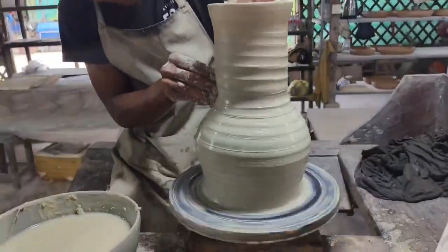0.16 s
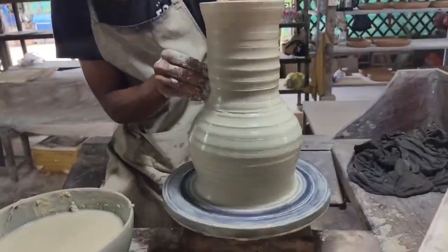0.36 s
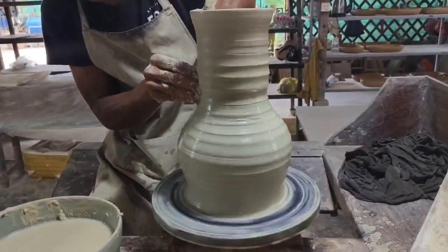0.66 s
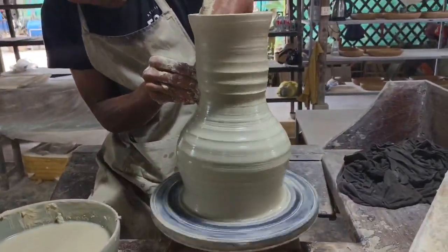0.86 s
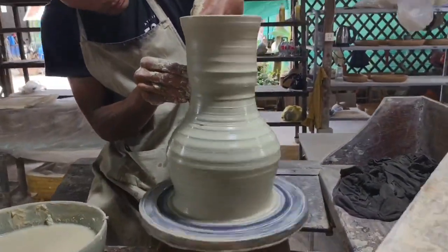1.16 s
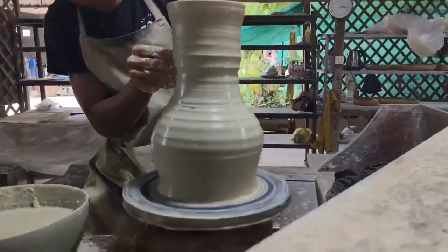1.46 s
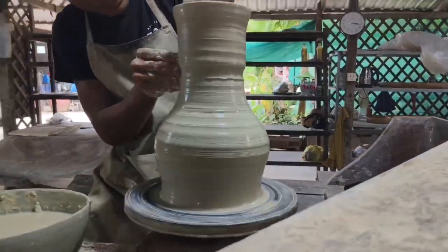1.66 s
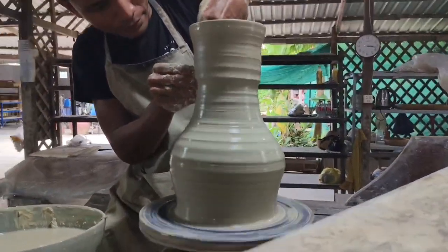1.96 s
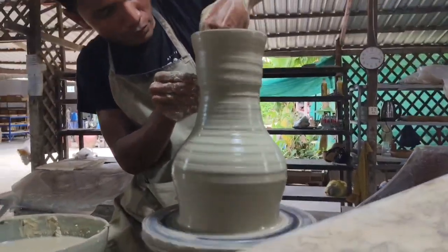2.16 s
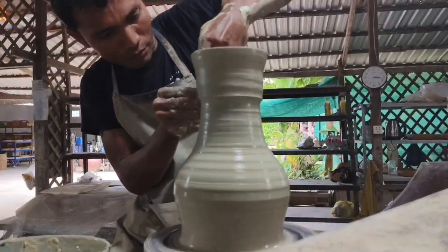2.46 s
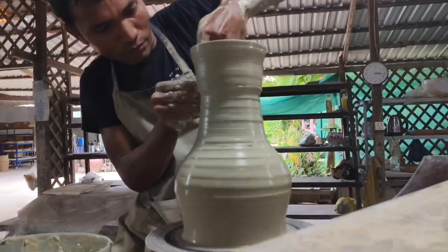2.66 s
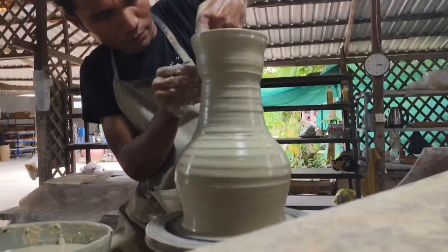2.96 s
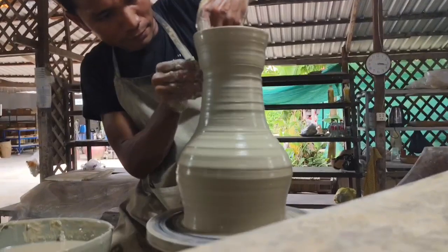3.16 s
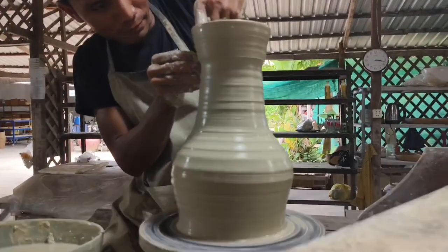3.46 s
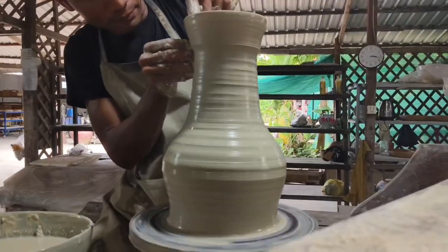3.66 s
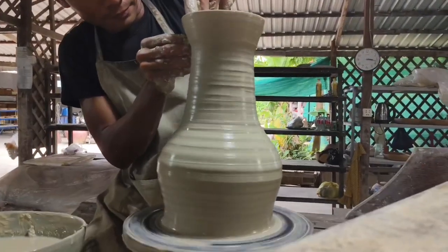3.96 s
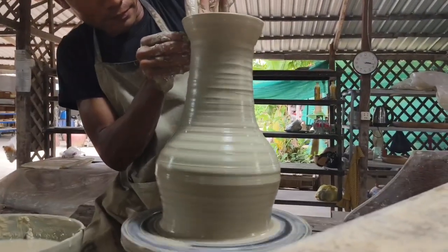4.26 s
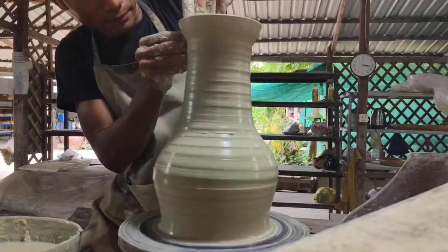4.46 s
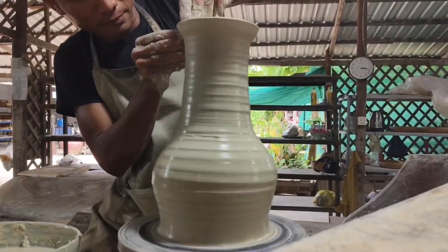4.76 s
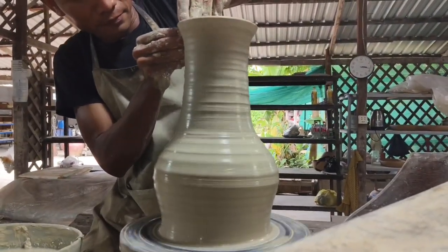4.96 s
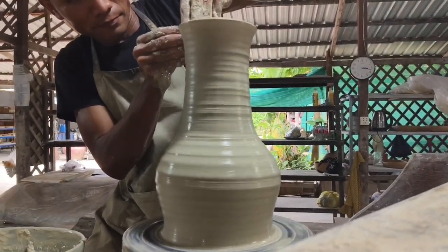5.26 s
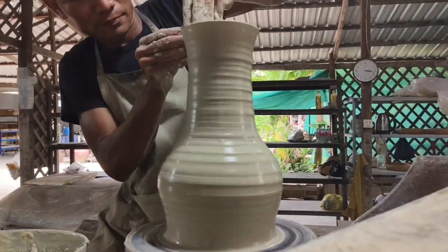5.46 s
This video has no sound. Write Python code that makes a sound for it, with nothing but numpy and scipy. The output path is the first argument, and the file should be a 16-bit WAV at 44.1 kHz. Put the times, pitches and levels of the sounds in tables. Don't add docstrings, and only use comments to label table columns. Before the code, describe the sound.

A potter's wheel hums deep and steady, roughened by dull, irregular bumps. Early on, wet clay spits sharply, then a soft wipe follows near two seconds. A dry bearing chirps and squeaks around three seconds, followed by ticks and foot scuffs. The hum pulses later, and a pot scrapes near the end. Close stereo microphones in an open, tin-roofed workshop, with faint far machines and leaves.

```python
import sys
import numpy as np
from scipy import signal
from scipy.fft import rfft, irfft, next_fast_len
from scipy.io import wavfile
from scipy.ndimage import uniform_filter1d, map_coordinates

SR = 44100
rng = np.random.default_rng(int(sys.argv[2]) if len(sys.argv) > 2 else 0)


def amplitude_ratio(level_db):
    exponent = np.asarray(level_db, float) / 20
    return 10 ** exponent


def unload_audio(sound):
    columns = np.transpose(np.atleast_2d(sound))
    steps = np.round(np.clip(columns, -1, 1) * 32767)
    wavfile.write(sys.argv[1], SR, steps.astype(np.int16))


N = 247386
TIME = np.arange(N) / SR
LAG_SAMPLES = 16


def unit(x):
    return x / np.sqrt(np.mean(x ** 2) + 1e-20)


def along(points, hz):
    f, v = np.transpose(points)
    return np.interp(np.log(hz + 1), np.log(f + 1), v)


def curves(rows):
    s, *cols = np.transpose(rows)
    return [np.interp(TIME, s, c) for c in cols]


def wobble(rate_hz):
    knots = rng.standard_normal(int(N * 400 / SR) + 4)
    return map_coordinates(knots, [TIME * min(rate_hz, 400)])


def filtered(x, response):
    m = next_fast_len(N + SR // 8)
    return irfft(rfft(x, m) * response(np.fft.rfftfreq(m, 1 / SR)), m)[..., :N]


def closed(spectrum):
    return lambda hz: amplitude_ratio(along(spectrum, hz)) * (hz > spectrum[0][0]) * (hz < spectrum[-1][0])


def noise(spectrum):
    return unit(filtered(rng.standard_normal(N), closed(spectrum)))


def tilted(pair, balance):
    return filtered(pair, lambda hz: amplitude_ratio(np.outer([.5, -.5], along(balance, hz))))


def diffuse(spectrum, lumps):
    # f/Hz, left-right likeness
    alike = [(30, 0.88), (70, .97), (130, 0.99), (220, 0.93), (350, 0.57), (640, -0.0059), (1000, -0.5),
             (1500, -0.58), (2200, -0.016), (3100, -0.14), (15000, 0.037)]
    # f/Hz, left-right/dB
    lean = [(60, -0.5), (110, 0.5), (200, 0.5), (380, 4.5), (700, 0), (1290, -1), (2380, -1.5),
            (4400, -4.5), (8120, -4), (15000, -2.5)]

    def mid_side(hz):
        angle = np.arccos(np.clip(along(alike, hz), -1, 1)) / 2
        return closed(spectrum)(hz) * [np.cos(angle), np.sin(angle)]

    mid, side = filtered(lumps * rng.standard_normal((2, N)), mid_side)
    return unit(tilted(np.array([mid + side, mid - side]), lean))


def swells(s, db, rise_s, t60_s):
    age = TIME - s[:, None]
    rise_s = np.maximum(rise_s, .002)[:, None]
    t60_s = np.maximum(t60_s, .01)[:, None]
    return amplitude_ratio(db) @ (np.clip(age / rise_s, 0, 1) ** 0.84 * amplitude_ratio(-60 * np.clip(age - rise_s, 0, 3) / t60_s))


def ring(hz, rise_s, t60_s, fall=0):
    t = TIME[:SR // 4]
    tone = np.sin(2 * np.pi * hz * t * (1 - fall * t / 2))
    return tone * amplitude_ratio(-60 * t / max(t60_s, .005)) * (1 - np.exp(-t / max(rise_s, 1e-4)))


def panned(db, pan_db):
    return amplitude_ratio(db + np.array([[pan_db], [-pan_db]]) / 2)


def labour_db():
    centre_s, width_s, peak_db = 1.78, 0.56, 4.5
    return peak_db * np.exp(-((TIME - centre_s) / width_s) ** 2)


def wheel():
    # t/s, boom level/dB
    load = [(0.0, -29), (0.5, -31.5), (0.58, -26.5), (0.75, -31.5), (1.23, -29), (1.48, -33.5),
            (1.55, -25.5), (1.63, -32.5), (1.72, -28), (1.8, -31.5), (2.0, -29.5), (2.45, -32), (2.75, -30),
            (3.37, -32), (3.65, -30), (3.9, -30), (4.14, -31.5), (5.61, -30)]
    # f/Hz, density/dB
    boom_spectrum = [(12, -26), (20, -16.5), (54, -14), (77, -10), (118, 2.5), (162, -4.5), (195, -8),
                     (321, -20), (359, -21.5), (397, -23), (600, -30.5), (780, -52), (1320, -120)]
    # f/Hz, density/dB
    bump_spectrum = [(120, -54), (230, 0.5), (400, -11.5), (550, -9), (800, -19.5), (1300, -22),
                     (2500, -51)]
    # t/s, level/dB
    surges = [
        (4.22, 4),
        (4.389, 3),
        (4.51, 4),
        (4.83, 4.5),
        (4.98, 5),
        (5.14, 1),
        (5.32, 1),
    ]
    beat_s, slack_db = 0.027, -2
    load_db, = curves(load)
    beats_db = sum(np.exp(-((TIME - s) / beat_s) ** 2) * (db - slack_db) for s, db in surges)
    boom_db = load_db + beats_db + slack_db * np.clip((TIME - surges[0][0]) / beat_s + 2, 0, 1)
    ease, fade_db_per_s = 0.31, 0.5
    bumps_db = -45.5 + labour_db() - ease * (boom_db - boom_db.mean()) - fade_db_per_s * TIME
    boom = diffuse(boom_spectrum, 1)
    boom = unit(boom / (1 + abs(boom / 2.27) ** 3) ** (1 / 3))
    flutter = amplitude_ratio(7 * np.tanh(.8 * wobble(95)) + 2.5 * np.tanh(wobble(14)))
    return amplitude_ratio(boom_db + 0.46) * boom + amplitude_ratio(bumps_db) * diffuse(bump_spectrum, flutter)


def knocks():
    # t/s, peak level/dB, f/Hz
    bumps = [(0.157, -31, 337), (0.267, -36, 394), (0.349, -29, 364), (0.692, -42, 343),
             (0.721, -22.5, 320), (0.898, -29, 310), (0.987, -22.5, 315), (1.064, -30.5, 480),
             (1.105, -26, 445), (1.348, -30, 422), (1.29, -32, 330), (1.374, -26, 410), (1.468, -29.5, 396),
             (1.847, -25.5, 336), (2.026, -34, 336), (2.397, -26.5, 325), (2.603, -22, 290),
             (2.829, -31.5, 350), (3.281, -27.5, 300), (3.629, -28.5, 307), (3.791, -34, 316),
             (3.943, -30.5, 386), (4.034, -28.5, 327), (4.073, -33.5, 407), (4.365, -30, 340),
             (4.656, -33, 327), (4.949, -34, 415), (5.061, -46, 413), (5.096, -34, 393), (5.402, -41, 334)]
    out = np.zeros((2, N + SR))
    for s, db, hz in bumps:
        pan_db = -4.5 + 4.1 * s
        upper = ring(1.99 * hz, 0.0053, 0.016) + amplitude_ratio(-19.5) * ring(3.22 * hz, 0.0012, 0.019)
        bump = ring(hz, 0.001, 0.021) + upper * [[1], [-.25]]
        out[:, round(s * SR):][:, :SR // 4] += panned(db + 2.5, pan_db) * bump
    return out[:, :N]


def slurry():
    # t/s, hiss level/dB, rise/s, sizzle over hiss/dB, body over hiss/dB
    spits = [(0.721, -44.5, 0.0063, 6, -21), (0.724, -31.5, 0.023, -10.5, -28),
             (0.785, -48, 0.02, -18, -27), (3.369, -34, 0.009, -10.5, -6), (3.4, -54, .008, -3, -7),
             (4.55, -59.5, .027, -5, -22), (4.777, -52.5, .012, -4, -9), (4.8, -55, 0.016, -0.5, -20),
             (5.052, -45.5, .016, -3.5, -10), (5.221, -47, 0.023, -5.5, -25),
             (5.528, -48.5, 0.018, -5, -3.5)]
    # t/s, level/dB, rise/s, t60/s, upper band over lower/dB
    wipes = [
        (1.08, -57.5, .07, 0.3, -18),
        (2.14, -48, 0.078, 0.47, -9),
        (2.21, -59, 0.078, 0.33, 5.5),
        (2.694, -53.5, 0.0087, 0.49, -4),
        (2.82, -57, 0.0098, 0.3, 5),
        (3.2, -58.5, 0.013, 0.18, 13.5),
        (3.42, -55, .02, 0.3, 1),
        (3.53, -60, 0.026, 0.17, -4),
        (4.785, -59, 0.015, .15, 1),
    ]
    # f/Hz, density/dB
    hiss_spectrum = [(1760, -23), (3000, -17.5), (3450, -17.5), (3760, -7), (4070, -8), (4700, -2.5),
                     (5070, 0.5), (5540, -3.5), (7150, -2), (9500, -23.5), (12400, -24), (20900, -120)]
    # f/Hz, density/dB
    sizzle_spectrum = [(5000, -44), (8500, 2.5), (12000, -0.5), (14500, -2.5), (15600, -11), (15900, -40)]
    # f/Hz, density/dB
    body_spectrum = [(700, -13), (1500, 7), (2500, 8.5), (3500, 12), (4500, -25)]
    # f/Hz, density/dB
    wet_spectrum = [(800, -21), (1300, -19), (2000, -7.5), (2700, -4), (3400, -17), (4200, -15)]
    s, db, rise_s, sizzle_db, body_db = np.transpose(spits)
    drain_s = 7.3 * rise_s
    hiss = swells(s, db, rise_s, drain_s) * noise(hiss_spectrum)
    sizzle = swells(s, db + sizzle_db, 0.83 * rise_s, drain_s) * noise(sizzle_spectrum)
    body = swells(s, db + body_db - 2.5, rise_s, 1.1 * drain_s) * noise(body_spectrum)
    droplets = amplitude_ratio(2.2 * wobble(300))
    s, db, rise_s, t60_s, upper_db = np.transpose(wipes)
    lower = swells(s, db, rise_s, t60_s) * noise(wet_spectrum)
    upper = swells(s, db + upper_db, rise_s, t60_s) * noise(hiss_spectrum)
    return droplets * amplitude_ratio(1.5) * (hiss + sizzle + body), amplitude_ratio(0.2) * (lower + upper)


def bearing():
    # t/s, level/dB, rise/s, t60/s, bite (upper orders over octave)/dB
    squeaks = [
        (2.656, -50.5, 0.015, 0.12, -11),
        (2.711, -43.5, .025, 0.061, -12),
        (2.785, -45.5, 0.016, 0.24, -4),
        (2.82, -40.5, 0.018, 0.058, -24),
        (3.049, -34.5, 0.016, 0.13, -8.5),
        (3.105, -45.5, 0.024, 0.37, -15),
        (3.19, -34.5, 0.034, 0.15, -8),
        (3.258, -65, .012, 0.054, -18),
        (3.295, -49.5, 0.022, 0.044, -14),
    ]
    # t/s, octave line f/Hz
    slip = [(2.65, 2384), (2.85, 2383), (3.1, 2401), (3.22, 2402), (3.35, 2430)]
    order_levels = [-1.5, -6.5, -9.5, -15.5, -9.5, -25, -22]
    # centre t/s, width/s, level/dB, left lag/rad
    lopsided = [
        (2.73, 0.023, -54, 1.2),
        (2.835, 0.017, -41.5, 1.2),
        (2.868, 0.0064, -51, 1.1),
        (3.075, 0.024, -42, 2.3),
        (3.15, 0.017, -41.5, 0.73),
        (3.21, 0.0065, -41.5, 1.4),
        (3.245, 0.0087, -35.5, 2.5),
        (3.268, 0.0053, -45, 0.6),
        (3.32, 0.0092, -52, 1.5),
    ]
    s, db, rise_s, t60_s, bite_db = np.transpose(squeaks)
    octave_hz, = curves(slip)
    phase = np.pi * np.cumsum(octave_hz * (1 + .009 * wobble(320))) / SR
    bite_s = 0.88 * t60_s
    octave = swells(s, db, rise_s, t60_s)
    third = swells(s, db - 4.5 + .6 * bite_db, rise_s, bite_s)
    high = swells(s, db + bite_db, rise_s, bite_s)
    orders = 0
    for order, level in enumerate([octave, third] + [amplitude_ratio(d) * high for d in order_levels], 2):
        orders = orders + level * (1 + .5 * wobble(190)) * np.sin(order * phase)
    phase = phase + 1.95 * wobble(70)
    low = 0
    for s, width_s, peak_db, lag_rad in lopsided:
        swell = amplitude_ratio(peak_db) * np.exp(-((TIME - s) / width_s) ** 2)
        low = low + swell * np.sin([phase - lag_rad, phase])
    return amplitude_ratio(2.0) * orders, low


def pots():
    # f/Hz, width/Hz, level/dB
    modes = [(2170, 140, -10), (2570, 130, 1.5), (4180, 350, -4), (5300, 310, -4.5), (5660, 270, -7.5),
             (6900, 340, -5)]
    # t/s, level/dB, rise/s, t60/s
    scrape = [
        (5.425, -38, 0.015, 0.15),
        (5.455, -50, 0.016, .2),
    ]
    # t/s, peak level/dB, t60/s
    ticks = [
        (.7265, -34, .012),
        (2.0193, -34, .003),
        (3.3735, -33, .015),
        (3.447, -48, .01),
        (4.137, -47, .008),
        (4.7805, -48, .012),
        (5.022, -50, .04),
    ]

    def wall(f):
        total = amplitude_ratio(-22) * (f > 1200) * (f < 8000)
        for k, (c, w, db) in enumerate(modes):
            total = total + (-1) ** k * amplitude_ratio(db) * 1j * f * w / (c * c - f * f + 1j * f * w + 1)
        return total

    chatter = unit(filtered(rng.standard_normal(N), lambda f: wall(f) * abs(wall(f)) ** 0.22))
    out = np.zeros(N + SR)
    out[:N] = swells(*np.transpose(scrape)) * amplitude_ratio(1.5 + 5.3 * wobble(110)) * chatter
    n = SR // 20
    for s, db, t60_s in ticks:
        crack = np.diff(uniform_filter1d(rng.standard_normal(n + 1), size=2))
        out[round(s * SR):][:n] += amplitude_ratio(db) * crack * amplitude_ratio(-60 * TIME[:n] / max(t60_s, .002))
    return out[:N]


def pings():
    # t/s, peak level/dB, f/Hz, t60/s, left-right/dB
    drips = [(.611, -50, 11200, 0.11, -6), (.633, -50, 11500, .16, -6), (.89, -57, 11800, .08, -6),
             (1.525, -45.5, 10950, 0.17, -8), (1.533, -57, 9100, .08, 0), (1.06, -40, 485, 0.07, 7),
             (1.105, -45, 467, .06, 3), (1.856, -37.5, 810, 0.1, -2), (1.905, -43.5, 827, 0.054, -13),
             (3.437, -42, 1920, 0.064, 5), (4.905, -37, 1140, 0.056, -9), (5.51, -49, 810, .15, 6),
             (4.06, -51, 2450, 0.074, -12), (5.44, -44, 2540, 0.23, -2), (1.262, -25, 265, 0.13, 1),
             (1.125, -25.5, 250, .12, 1), (2.56, -24, 250, 0.088, 2)]
    out = np.zeros((2, N + SR))
    for s, db, hz, t60_s, pan_db in drips:
        tone = ring(hz, 0.026 * t60_s, t60_s, fall=1.1 * (hz < 1400))
        out[:, round(s * SR):][:, :SR // 4] += panned(db, pan_db) * tone
    return out[:, :N]


def scuffs():
    # t/s, level/dB, rise/s, t60/s
    rubs = [
        (1.09, -56, .04, 0.23),
        (3.43, -53, .015, .12),
        (3.535, -51, 0.028, .25),
        (4.79, -55, 0.034, .15),
        (5.43, -55, .015, 0.13),
    ]
    # f/Hz, density/dB
    sole = [(600, -18), (900, -2), (1400, -2), (1900, -3), (2600, -20)]
    rub = swells(*np.transpose(rubs)) * amplitude_ratio(2.6 * wobble(90))
    return rub * (noise(sole) + 0.49 * np.array([noise(sole), noise(sole)]))


def workshop():
    # t/s, wetness/dB
    wetness = [(0.0, 0), (0.83, 0), (1.53, -3.5), (2.3, -7.5), (2.67, -6.5), (3.09, 0.5), (3.59, -10.5),
               (4.16, -9), (4.58, -27), (5.08, -20), (5.2, -1), (5.61, 2.5)]
    # f/Hz, density/dB
    shop_spectrum = [(410, -74), (700, -0.5), (1120, -3.5), (1220, -10.5), (1620, -7.5), (1680, -9),
                     (1960, -4), (2120, -9), (2440, -8.5), (3000, -15), (4850, -11.5), (5630, -13.5),
                     (7600, -17.5), (9880, -38), (16700, -120)]
    # f/Hz, density/dB
    film_spectrum = [(7000, -7), (7600, 4.5), (9200, 3), (9800, -27)]
    # f/Hz, density/dB
    fizz_spectrum = [(5590, -41), (9500, -3), (10600, -6), (12000, -1.5), (12800, -1), (14900, -3),
                     (15900, -2)]
    wet_db, = curves(wetness)
    swell = wobble(6.21)
    shop_db = -51.5 + 0.16 * wet_db + 0.5 * labour_db()
    shop = amplitude_ratio(shop_db) * diffuse(shop_spectrum, amplitude_ratio(0.92 * swell + 0.73 * wobble(60)))
    film = amplitude_ratio(-65.5 + 1.9 * wet_db) * diffuse(film_spectrum, amplitude_ratio(0.26 * swell))
    fizz = amplitude_ratio(-64.5 + 0.26 * wet_db) * diffuse(fizz_spectrum, amplitude_ratio(0.73 * swell + 1.0 * wobble(97)))
    return shop + film + fizz


def roof(x):
    # f/Hz, t60/s
    decay = [(300, 0.92), (2500, 0.23), (6000, 0.13), (14000, 0.1)]
    hz, t, z = signal.stft(rng.standard_normal((2, SR // 2)), SR, nperseg=256)
    tail = signal.istft(z * amplitude_ratio(-60 * t / along(decay, hz)[:, None]), SR, nperseg=256)[1]
    delayed = np.pad(np.atleast_2d(x), ((0, 0), (300, 0)))
    return signal.fftconvolve(delayed, tail / np.linalg.norm(tail[0]), axes=1)[:, :N]


def from_right(direct, echoed):
    # f/Hz, left-right/dB
    sideways = [(300, 0), (1300, 0), (2400, -2), (4000, -7), (5100, -11), (7000, -7), (9300, -1),
                (11500, -8), (13500, -10)]
    return tilted(np.array([np.roll(direct, LAG_SAMPLES), direct]) + roof(echoed), sideways)


def scene():
    tones, (spit, wipe), (squeak, low), pot = pings(), slurry(), bearing(), pots()
    echoed = amplitude_ratio(-1) * spit + amplitude_ratio(-1) * wipe + amplitude_ratio(-8) * squeak + amplitude_ratio(-14) * low[1] + amplitude_ratio(-5) * pot
    middle = amplitude_ratio(-3) * np.array([np.roll(wipe, LAG_SAMPLES // 3), wipe])
    near = from_right(amplitude_ratio(-1.5) * spit + squeak + pot, echoed) + low + middle
    far = amplitude_ratio(-14) * roof(tones)
    return wheel() + knocks() + workshop() + near + tones + far + scuffs()


def roll_off(x):
    return signal.sosfilt(signal.butter(12, 16040, fs=SR, output="sos"), x)


def record(dry):
    mix = filtered(dry, lambda hz: np.clip((15650 - hz) / 700, 0, 1))
    return roll_off(mix)


dry = scene()
out = record(dry)
unload_audio(out)
```